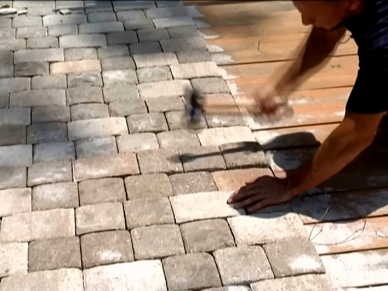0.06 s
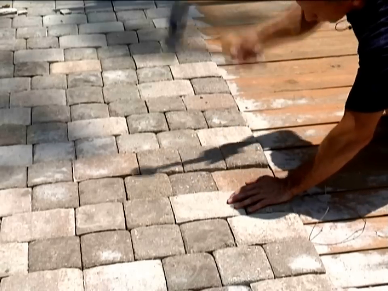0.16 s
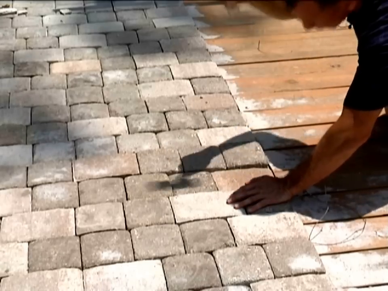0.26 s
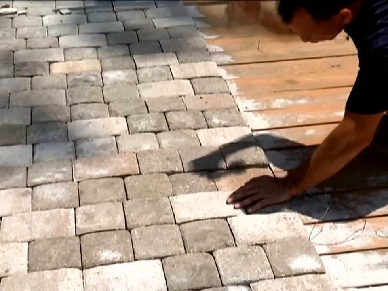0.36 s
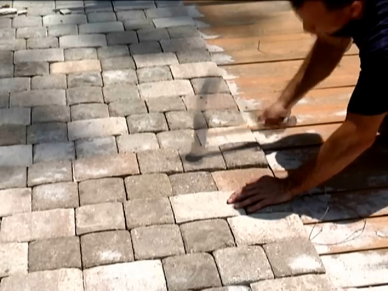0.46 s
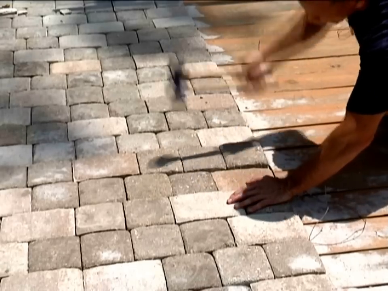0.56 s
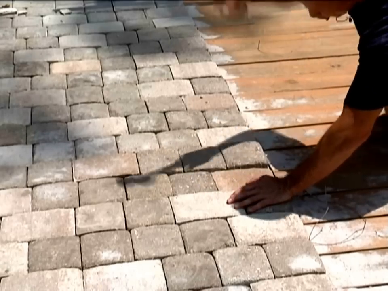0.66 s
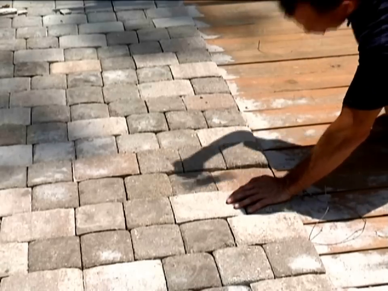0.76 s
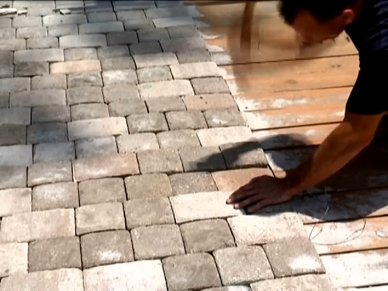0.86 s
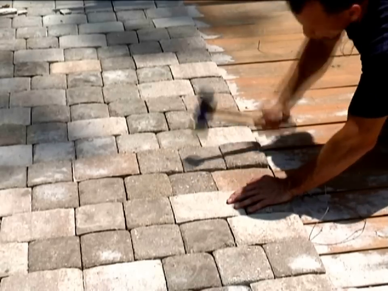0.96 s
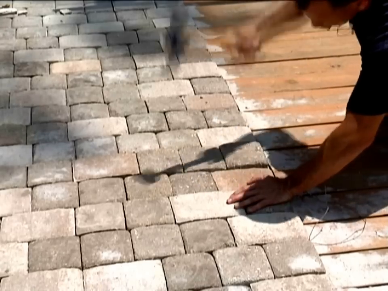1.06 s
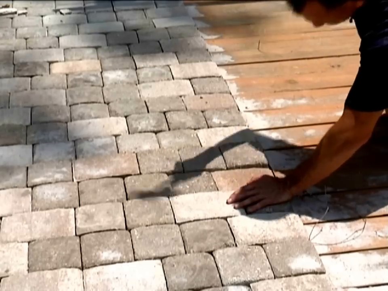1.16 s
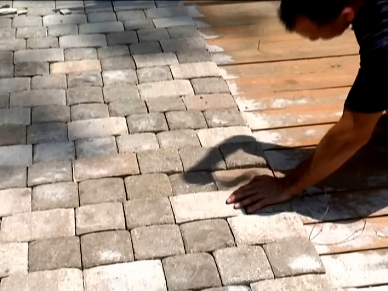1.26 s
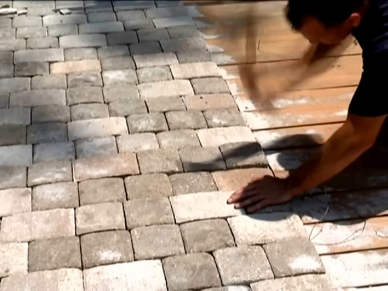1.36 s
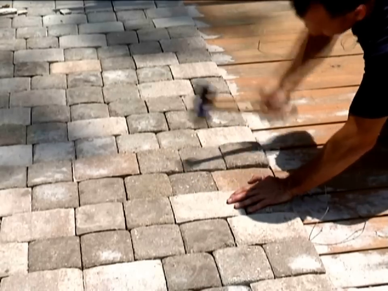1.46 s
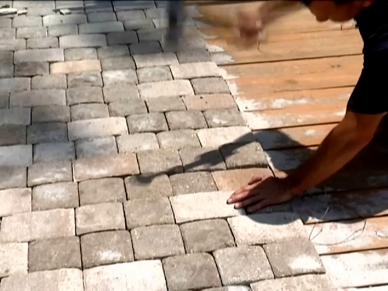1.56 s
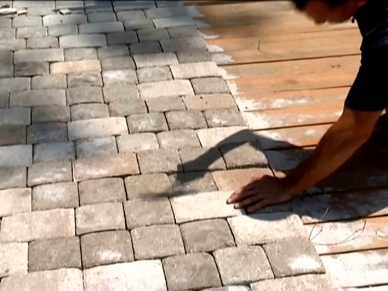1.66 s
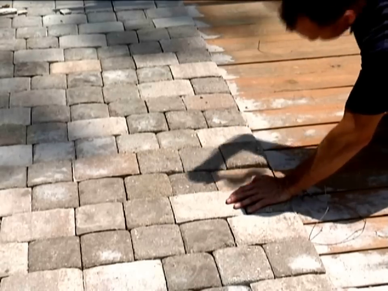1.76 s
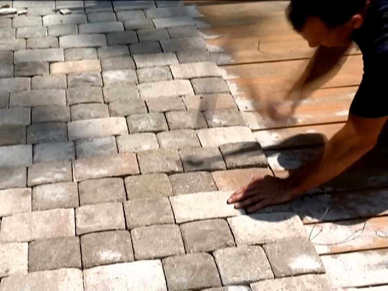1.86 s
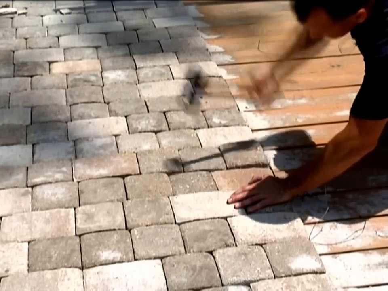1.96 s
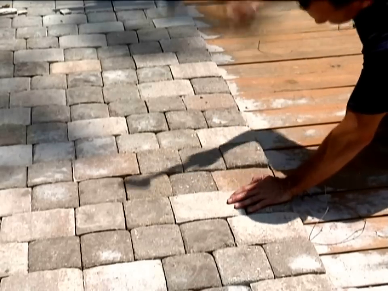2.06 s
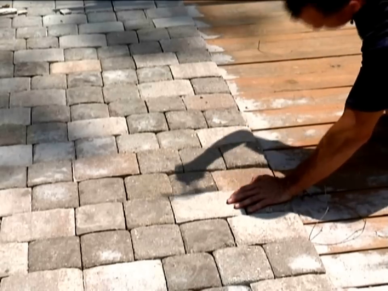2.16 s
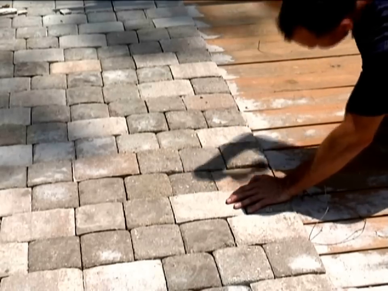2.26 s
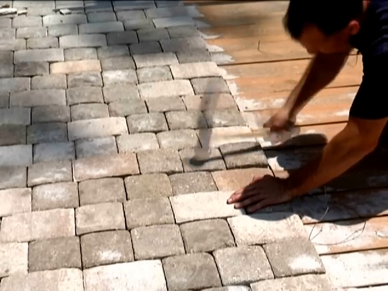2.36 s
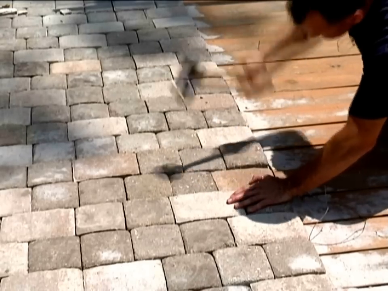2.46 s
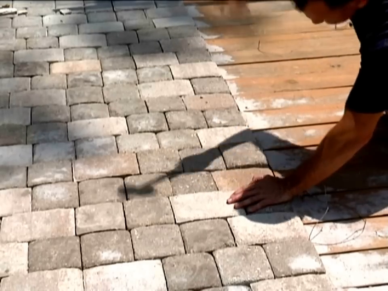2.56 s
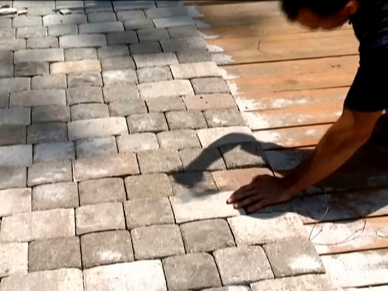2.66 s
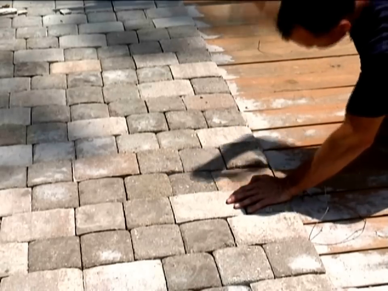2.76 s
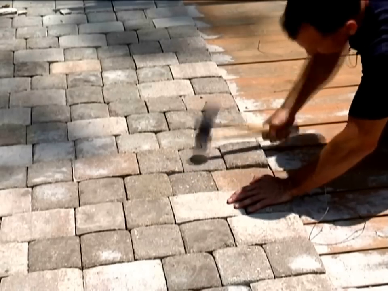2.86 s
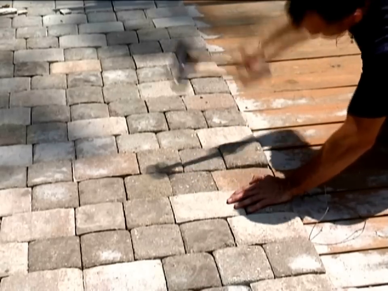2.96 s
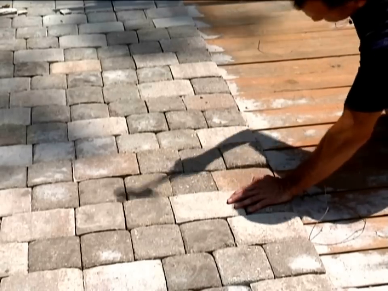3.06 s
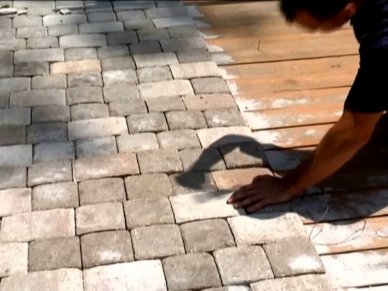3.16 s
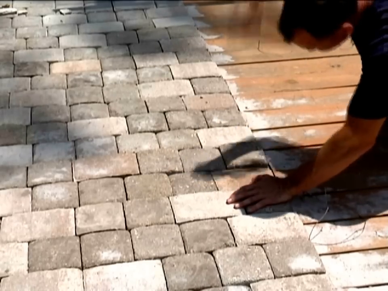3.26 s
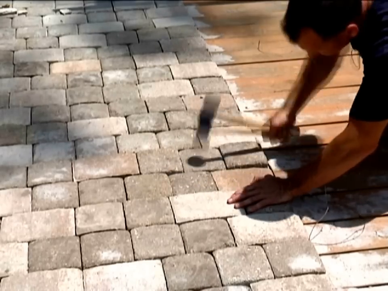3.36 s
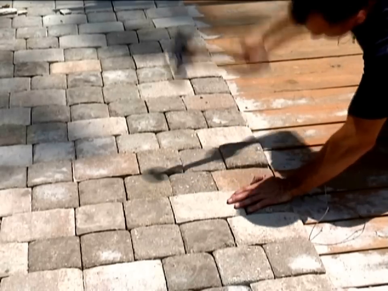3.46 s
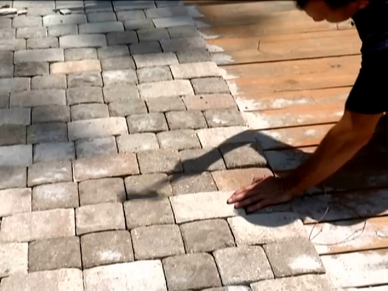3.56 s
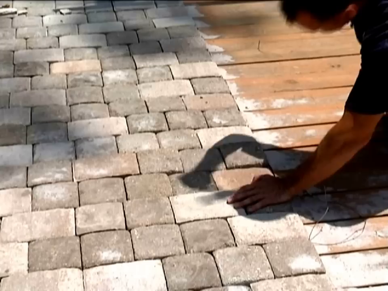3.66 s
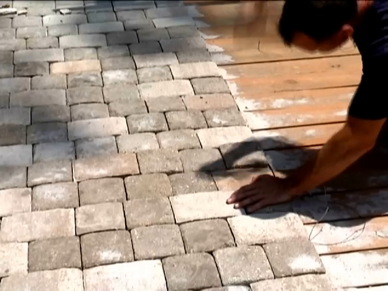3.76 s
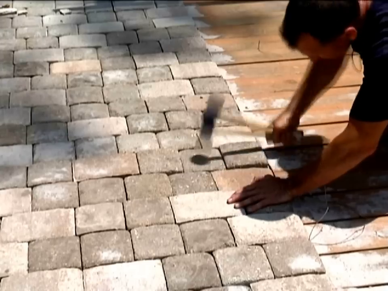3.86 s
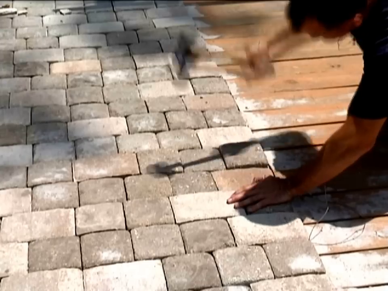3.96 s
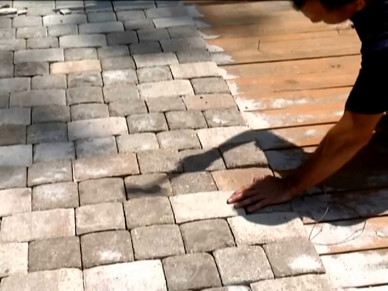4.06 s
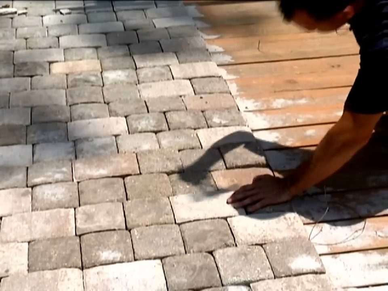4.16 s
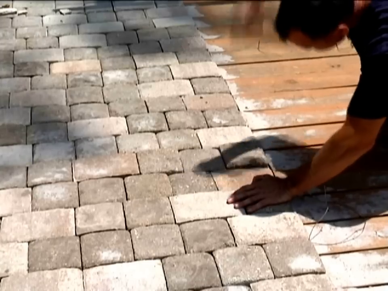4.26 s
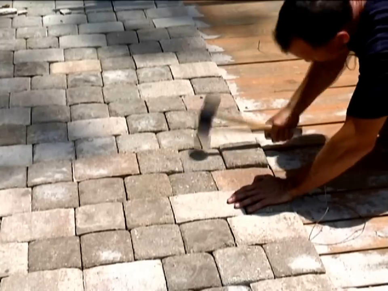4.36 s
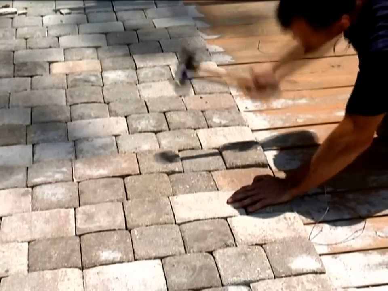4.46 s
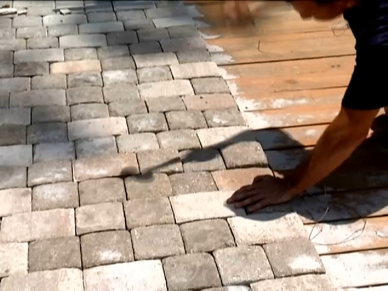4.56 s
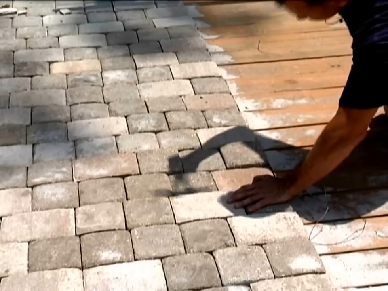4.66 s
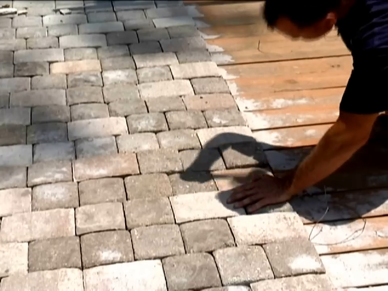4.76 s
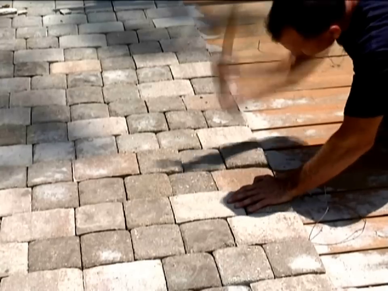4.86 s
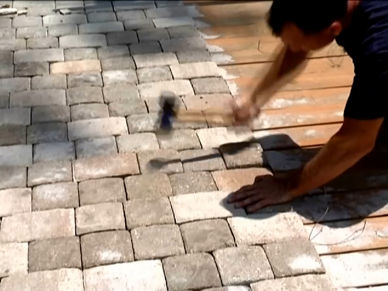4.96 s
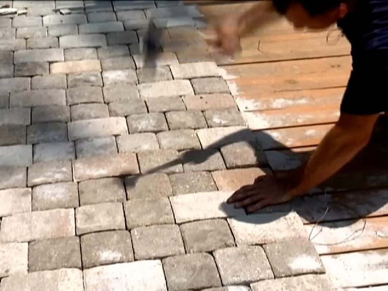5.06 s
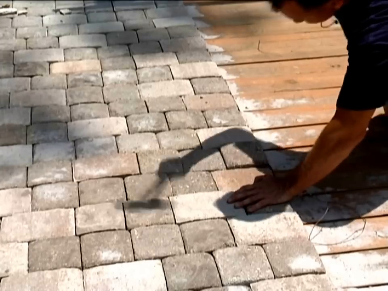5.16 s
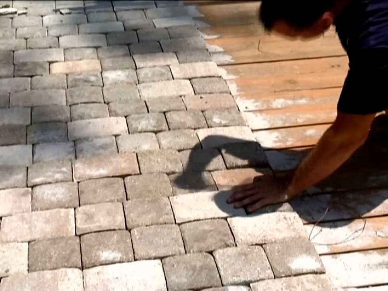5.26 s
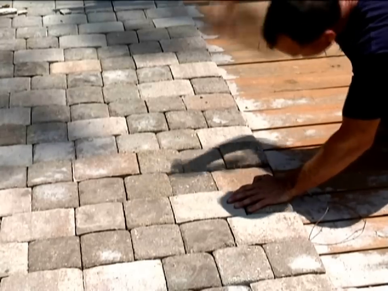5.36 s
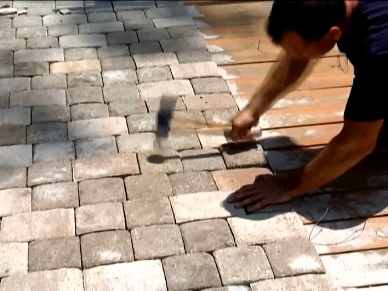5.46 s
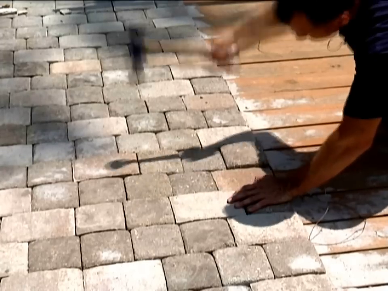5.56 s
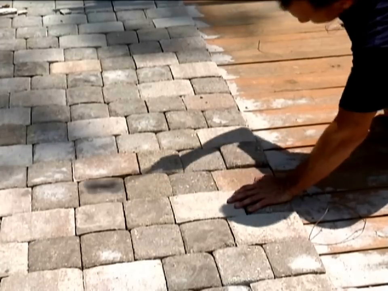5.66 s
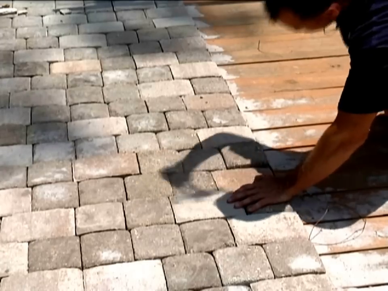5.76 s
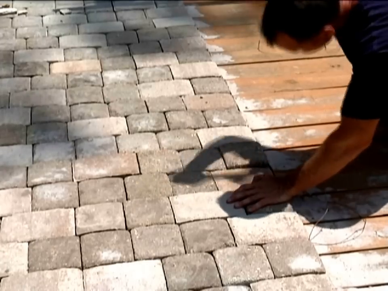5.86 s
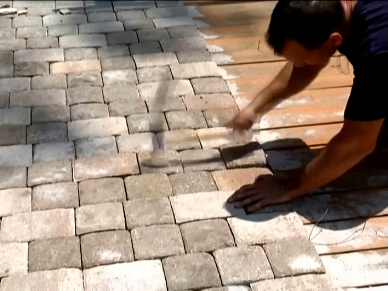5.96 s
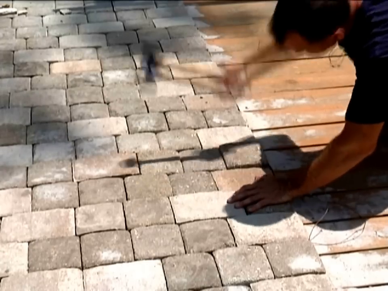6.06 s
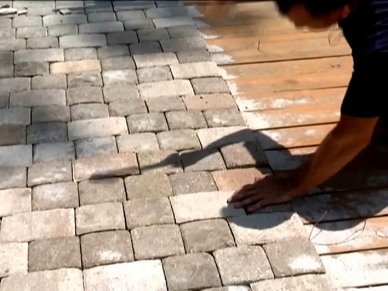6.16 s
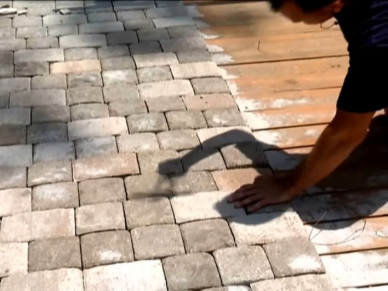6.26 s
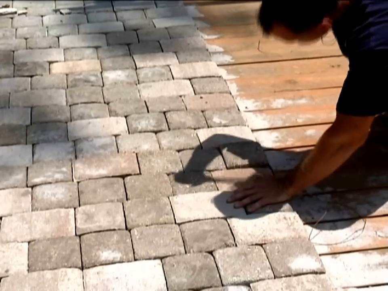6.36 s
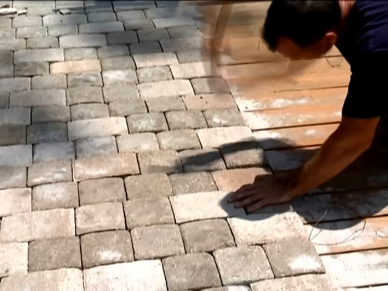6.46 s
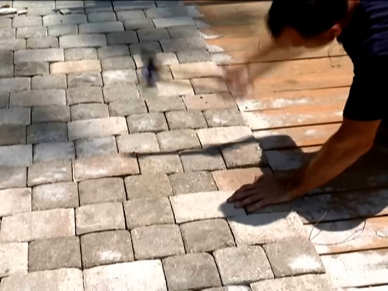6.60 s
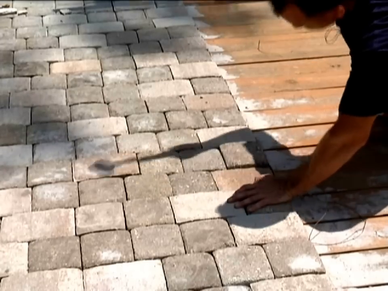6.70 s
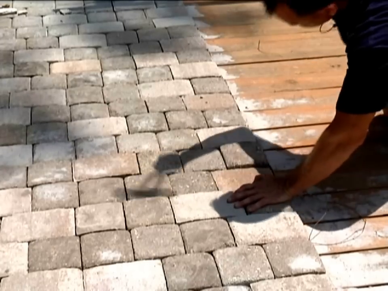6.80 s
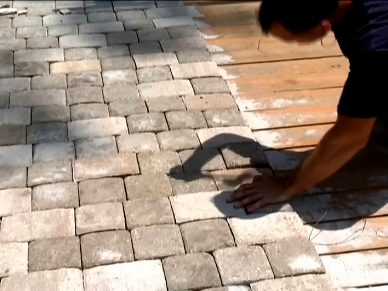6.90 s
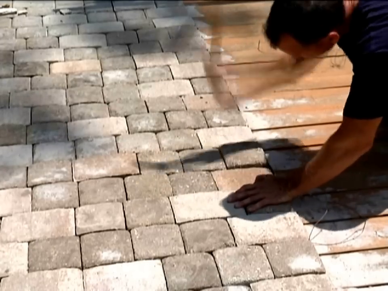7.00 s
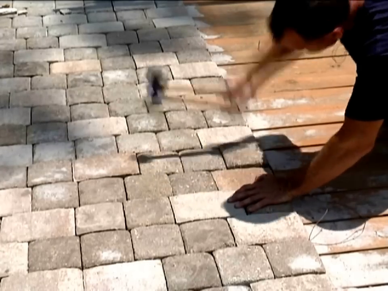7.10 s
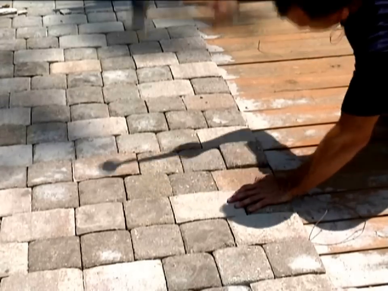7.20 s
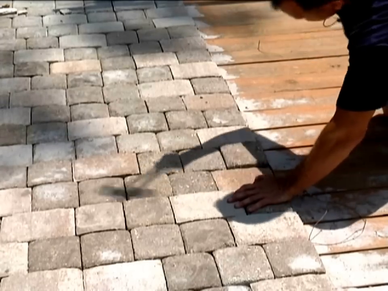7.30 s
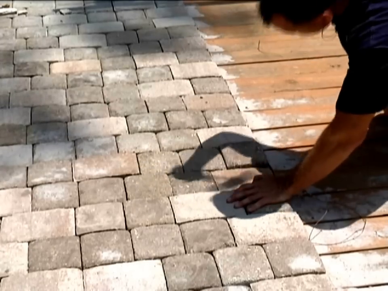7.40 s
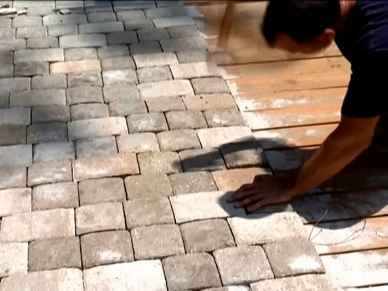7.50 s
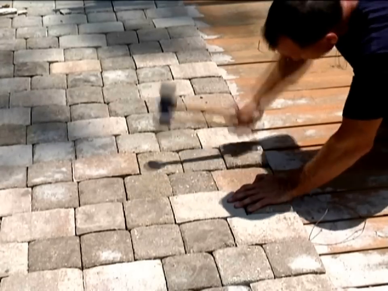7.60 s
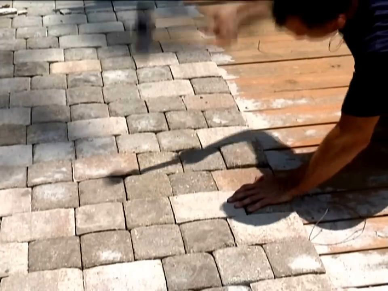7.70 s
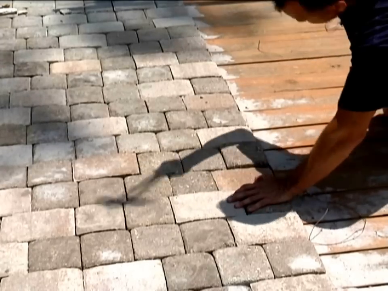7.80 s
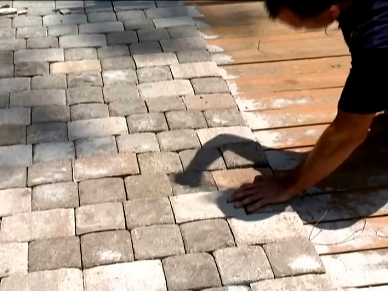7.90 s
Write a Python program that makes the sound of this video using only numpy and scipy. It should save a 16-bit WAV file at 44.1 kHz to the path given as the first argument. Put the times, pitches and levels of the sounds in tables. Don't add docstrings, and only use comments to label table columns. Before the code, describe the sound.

A rubber mallet strikes a concrete paver on a raised wooden deck outdoors, beginning immediately at 0 s and repeating about every half second, with the last of sixteen blows near 7.6 s. The opening two are slightly weaker; spacing widens a little after 4.3 s. Each blow is a hard rubbery slap with a deep 90 Hz deck thump, a knocky paver ring near 900 Hz, brief loose-stone rattle and a tiny rebound about 20 ms later, clearer on some later blows. On the left, a clothing microphone distorts on impact, then catches fizzy shirt rustle, coarser from 1.5 s, low body rumble and dry cable ticks, with short cloth drags around 2.8, 4.3 and 4.4 s. On the right, a farther microphone hears a cleaner, quieter thud and faint hum. Wall echoes follow within 0.2 s over a steady soft outdoor hush.

```python
import sys
import numpy as np
from scipy import signal
from scipy.fft import rfft, irfft
from scipy.io import wavfile
from scipy.ndimage import uniform_filter1d

SR = 44100
rng = np.random.default_rng(int(sys.argv[2]) if len(sys.argv) > 2 else 0)


def wrap_up_sound(samples):
    columns = np.atleast_2d(samples).T
    tamed = np.clip(columns, -1, 1)
    steps = np.round(tamed * 32767).astype(np.int16)
    wavfile.write(sys.argv[1], SR, steps)


def how_loud(loudness_db):
    steps = np.asarray(loudness_db, float) / 20
    return 10 ** steps


N = 350018
LEAD = 2048
FAR_S = 0.0052

# start_s, strength_db, paver_hz, rebound_db
FIRST_BLOW = (-.0045, -10, 900, -23)
BLOWS = [(0.467, -10, 891, -23), (0.921, -7.5, 904, -22.5), (1.399, -7.5, 893, -17),
         (1.879, -6.5, 925, -21), (2.364, -7.5, 932, -20), (2.852, -9, 943, -22), (3.34, -8, 873, -15),
         (3.842, -7.5, 926, -22), (4.343, -7.5, 868, -14), (4.905, -7, 915, -30), (5.442, -9, 899, -13),
         (5.972, -8.5, 890, -14), (6.512, -6.5, 832, -14), (7.035, -7.5, 864, -15),
         (7.561, -7.5, 898, -18.5)]
# mode_hz, level_db, t60_s, arrival_ms
NEAR_MODES = [(90.4, 25.5, 0.039, 4.783), (88.7, -15.5, 0.29, 6.7), (58, -25, 0.13, 12.6),
              (111, -16, 0.13, 5.1), (165.1, -4, 0.19, 5.23), (232.8, 5.5, 0.098, 4.34),
              (340.5, -20, 0.33, 2.53), (438, 7.5, 0.063, 3.66), (494, -12.5, 0.13, 1.37),
              (736, 3, 0.079, 1.224), (1345, 2.5, 0.016, 0.64)]
# mode_hz, level_db, t60_s, arrival_ms
FAR_MODES = [(81.4, -15.5, 0.25, 4.4), (140, -18, 0.12, 4.2), (189, -12, 0.098, 0.86),
             (258, -9.5, 0.11, 3.18), (377, -9, 0.08, 2.06), (470, 5.5, 0.0088, 1.264),
             (824, -21, 0.0043, 0.92), (2650, -5, 0.0045, 0.023), (2990, -10.5, 0.0058, 0.12),
             (6720, 0, 0.0046, 0.037), (6600, -29, 0.089, 0.39)]
# freq_hz, level_db
SLAP_COLOUR = [(300, -8), (1000, 4.5), (2200, 3.5), (3800, -8.5), (6300, -1.5), (10000, -2.5),
               (14000, -5.5), (16000, -43)]
# freq_hz, level_db
SHAKE_COLOUR = [(100, 7.5), (200, 6.5), (450, 3), (900, -12), (1500, -32), (3000, -27), (6000, -63)]
# freq_hz, t60_s
YARD_T60 = [(80, 0.83), (250, 0.8), (700, 0.44), (2000, 0.87), (6000, 1), (12000, 0.47)]
# freq_hz, shirt_db, camera_db
YARD_COLOUR = [(50, -14, -38), (97, -30, -9), (272, -11.5, -21), (642, -28.5, -26), (1360, -29.5, -40),
               (2580, -30, -35), (4250, -37.5, -45.5), (6700, -34, -40.5), (10400, -29.5, -33),
               (14700, -44, -65), (15100, -90, -100)]
# delay_ms, over_tail_db
ECHOES = [
    (62, -1.5),
    (67, -25),
    (97, -0.5),
    (196, 0.5),
]
# freq_hz, level_db
RUSTLE_COLOUR = [(500, 9), (1200, -9.5), (2500, -15.5), (3900, -5), (5500, 0), (9000, -1.2), (12000, -2),
                 (14000, -6.5), (14800, -40), (15500, -80)]
# freq_hz, level_db
RUMBLE_COLOUR = [(20, -20), (40, -6), (70, 5.5), (130, 0.5), (220, -7), (400, -15), (800, -37), (1500, -52),
                 (5000, -73)]
# freq_hz, level_db
RASP_COLOUR = [(300, -31), (900, 2.5), (1800, -5), (2700, 0.5), (3300, -7.5), (3900, -59), (6000, -48)]
# rustle_db, rasp_db
JOLTS = [(-49.5, -77), (-54, -77), (-45, -60), (-46, -52.5), (-45, -61), (-45, -51.5), (-48, -46.5),
         (-47, -48), (-49, -47), (-43.5, -46), (-44.5, -49), (-53, -72), (-49, -51.5), (-47.5, -48),
         (-49.5, -51), (-51.5, -54)]
# peak_s, peak_db, fade_db_per_s
LIFTS = [(0.17, -77, 85.5), (0.42, -71, 190), (2.68, -67, 147), (3.25, -64.5, 115), (3.72, -62, 93),
         (4.73, -62.5, 39), (5.28, -53.5, 95), (5.72, -63, 105), (6.27, -63.5, 55), (6.81, -62, 100),
         (7.33, -66, 91), (7.93, -59, 394.5)]
# start_s, length_s, end_db, swell_db, pitch_factor
DRAGS = [
    (2.806, 0.052, -36.5, 12, 2.5),
    (4.312, .03, -42.5, -2.5, 2.2),
    (4.412, 0.045, -34, -3.5, 0.95),
]
# mode_hz, width_hz, level_db
DRAG_MODES = [(196, 140, 23), (416, 75, 13.5), (536, 40, -8), (705, 14, -9)]
# mode_hz, t60_s
CLIP_MODES = [(900, 0.0097), (2500, 0.0098), (5400, 0.011), (10300, 0.012)]
# start_s, peak_db, top_mode_db
KNOCKS = [
    (2.341, -27.5, -16),
    (2.816, -34.5, -11),
    (3.809, -27, -35),
    (4.314, -52, 9),
    (5.394, -36.5, -17),
    (6.468, -56, 11),
    (6.95, -42, -14),
    (7.523, -28, -23),
]
# start_s, peak_db, top_mode_db
SNAPS = [(0.458, -46, -2), (0.756, -48, -14), (0.905, -31.5, 7.5), (1.348, -56, -10), (1.38, -37.5, -3),
         (1.86, -38.5, 3), (2.311, -29.5, -0.5), (3.325, -34, -2), (3.445, -44, 7), (3.826, -47, 11),
         (4.891, -38, 1), (5.415, -35.5, 3.5), (5.72, -48, -25), (5.746, -43, -2), (6.27, -37, -1),
         (6.299, -44, 0.5), (6.822, -29, 0.3), (6.847, -38, -3), (7.337, -31.5, -5), (7.833, -43, -6),
         (7.881, -45, -13)]
# start_s, peak_db, top_mode_db
PINGS = [(0.074, -52, 12), (0.128, -34.5, -7), (0.986, -50, 16), (0.293, -55, 0), (0.311, -61, 12),
         (1.302, -52, -2), (1.449, -34, -7), (2.144, -29.5, -5), (2.61, -40, -8), (2.836, -39, 7),
         (4.984, -33, -3), (5.165, -45, -14), (7.351, -40, 1)]
# freq_hz, shirt_db, camera_db
AIR_COLOUR = [(30, -21, -26), (60, -26, -7), (150, -7.5, -11.5), (400, -11, -19), (1020, -9.5, -24.5),
              (2380, -22.5, -35), (4060, -48, -41), (6700, -47, -39), (9800, -25, -38), (12600, -48, -74),
              (13900, -70, -90), (14900, -100, -110)]
# freq_hz, gain_db
CAMERA_RESPONSE = [(30, -16), (60, -15), (100, 2.5), (2500, 2), (4600, 0), (6400, 2.5), (8500, -8),
                   (11000, -8.5), (14000, -39)]
# from_hz, open_db
TOP_BANDS = [(12000, -93), (12800, -88), (13700, -80), (14400, -72), (15200, -68), (16000, -72)]


def mallet():
    out, kicks = np.zeros((2, N + LEAD)), np.zeros(N + LEAD)
    for start_s, strength_db, paver_hz, rebound_db in [FIRST_BLOW] + list(BLOWS):
        hit_s, force = start_s + 0.0007, how_loud(strength_db + 9)
        deck_modes(out, hit_s, force)
        lead_in(out, hit_s, force)
        paver_slap(out, hit_s, force, paver_hz)
        grit(out, hit_s, force)
        rebound(out, hit_s, force * how_loud(rebound_db - 7.5), paver_hz)
        add(kicks, hit_s, force * (np.eye(1, 2048)[0] + 0.19 * burst(0.00053)))
    out += how_loud(11.5) * signal.oaconvolve(kicks[None], yard(), axes=1)[:, :N + LEAD]
    return out[:, LEAD:]


def deck_modes(out, hit_s, force):
    spot = rng.standard_normal((2, 11, 2))
    for side, (modes, gain_db) in enumerate([(NEAR_MODES, -12), (FAR_MODES, -13)]):
        body = 0
        for (hz, level_db, t60_s, arrival_ms), (u, v) in zip(modes, spot[side]):
            body = body + how_loud(level_db + 1.22 * u) * ring(hz * (1 + 0.024 * v), t60_s, arrival_ms)
        add(out[side], hit_s + side * FAR_S, force * how_loud(gain_db) * body)


def lead_in(out, hit_s, force):
    swell = np.linspace(0, 1, 500) ** 6
    count = len(swell)
    from_s = hit_s - count / SR
    add(out[0], from_s, force * how_loud(-9.0) * swell * (1 + 0.54 * burst(0.068)[:count]))
    add(out[0], from_s, force * how_loud(-14.5) * np.sqrt(swell) * burst(0.6, colour=SHAKE_COLOUR)[:count])
    add(out[1], from_s + FAR_S, force * how_loud(-15) * swell * burst(0.2)[:count])


def paver_slap(out, hit_s, force, paver_hz):
    add(out[0], hit_s, force * how_loud(6.5) * -ring(paver_hz, 0.025, 0, count=4096))
    low_hz = paver_hz * rng.uniform(0.5614, 0.7585)
    add(out[0], hit_s, force * how_loud(3.5) * ring(low_hz, 0.042, rng.uniform(0.48, 1.35), count=4096))
    add(out[0], hit_s, force * how_loud(7.5) * burst(0.0072, 0.55))
    add(out[1], hit_s + FAR_S, force * how_loud(-8.5) * (burst(0.0037) + how_loud(-26.5) * burst(0.15)))


def grit(out, hit_s, force):
    add(out[0], hit_s, force * how_loud(-14.5) * burst(0.061, 3))
    add(out[0], hit_s, force * how_loud(-7) * burst(0.11, 2.3, SHAKE_COLOUR, count=8192))
    late_fade = np.clip((np.arange(16384) / SR - 0.03) / 0.024, 0, 1)
    add(out[0], hit_s, force * how_loud(-23.5) * burst(0.49, 29, SHAKE_COLOUR, count=16384) * late_fade)
    add(out[1], hit_s + FAR_S, force * how_loud(-44) * burst(0.71, 2.44, SHAKE_COLOUR, count=8192))


def rebound(out, hit_s, gain, paver_hz):
    rebound_ms, handle_hz = 22.2, 5670
    slap = burst(0.035, rebound_ms - 0.4)
    paver = 1.66 * ring(paver_hz, 0.034, rebound_ms, count=2048)
    handle = 1.85 * ring(handle_hz, 0.0086, rebound_ms + 0.3, count=2048)
    add(out[0], hit_s, gain * (slap + paver + handle))


def yard():
    taps = np.zeros((2, SR))
    at = np.arange(400, SR - 22, 22) + rng.integers(0, 22, (2, (SR - 401) // 22))
    np.put_along_axis(taps, at, rng.choice([-1., 1.], at.shape), axis=1)
    for delay_ms, over_tail_db in ECHOES:
        taps[:, round(delay_ms * SR / 1000)] += how_loud(over_tail_db + np.array([6, 15]))
    hz, t, z = signal.stft(taps, SR, nperseg=512)
    colour_db = np.array([read(YARD_COLOUR, hz, column=k) for k in (1, 2)])[..., None]
    thin_db = -6.0 * np.outer(hz > 1000, t < ECHOES[0][0] / 1000 - 0.004)
    decay_db = -60 * t / read(YARD_T60, hz)[:, None]
    tail = signal.istft(z * how_loud(colour_db + thin_db + decay_db), SR, nperseg=512)[1]
    onset = np.clip(np.arange(tail.shape[1]) / SR / 0.029 - 1, 0, 1)
    return tail * onset


def shirt():
    grain_gain = how_loud(1.0 * np.minimum(rng.exponential(1, N), 5))
    grains = grain_gain * rng.standard_normal(N) * (rng.random(N) < 3000 / SR)
    smooth = noise(lambda hz: read(RUSTLE_COLOUR, hz), size=256, patchy_db=4.5, flicker_db=1.0)
    rustle = evened(evened(smooth) + 0.74 * evened(coloured(grains, RUSTLE_COLOUR)))
    rumble = evened(noise(lambda hz: read(RUMBLE_COLOUR, hz), size=1024, patchy_db=2.5, flicker_db=-1.0))
    rasp = evened(noise(lambda hz: read(RASP_COLOUR, hz), size=512, patchy_db=5.5, flicker_db=-1.0))
    rustle_power, rumble_power, rasp_power = shirt_motion()
    out = 0
    for layer, gain_db, power, rest_db in [(rustle, 13.2, rustle_power, -66),
                                           (rumble, 7.8, rumble_power, -50.5),
                                           (rasp, 6.5, rasp_power, -71.5)]:
        out = out + how_loud(gain_db) * np.sqrt(power + how_loud(rest_db) ** 2) * layer
    return out


def shirt_motion():
    blow_s = np.array([FIRST_BLOW] + list(BLOWS))[:, 0]
    rustle_db, rasp_db = np.transpose(JOLTS)
    lift_s, lift_db, fade_db_per_s = np.transpose(LIFTS)
    fine = peaks(blow_s + 0.1, rustle_db, rise_db_per_s=133, fall_db_per_s=116)
    coarse = peaks(blow_s + 0.1, rasp_db, rise_db_per_s=133, fall_db_per_s=77)
    lift = peaks(lift_s, lift_db, fade_db_per_s, fade_db_per_s)
    downswing = peaks(blow_s, -58, rise_db_per_s=214, fall_db_per_s=1000)
    arm = lift + downswing
    body = peaks(blow_s + 0.091, -40, rise_db_per_s=77, fall_db_per_s=60)
    return fine + arm, body, coarse + how_loud(-2.5) ** 2 * arm


def drag():
    attack_s, release_lengths, fade_db = 0.008, 2.22, -23
    slips = rng.standard_normal(N) * (rng.random(N) < 600 / SR)
    out = np.zeros(N)
    for start_s, length_s, end_db, swell_db, pitch in DRAGS:
        body = sum(how_loud(db) * ring(pitch * hz, 1.9 / (pitch * width_hz), 0, count=4096)
                   for hz, width_hz, db in DRAG_MODES)
        stroke = [(start_s, end_db - swell_db - 21),
                  (start_s + attack_s, end_db - swell_db),
                  (start_s + length_s, end_db),
                  (start_s + length_s * (1 + release_lengths), end_db + fade_db)]
        out += how_loud(15) * curve(stroke) * evened(signal.oaconvolve(slips, body)[:N])
    return out


def cable():
    out = np.zeros(N + LEAD)
    for rows, low_modes_db in [(KNOCKS, (0, -15.5, -39)), (SNAPS, (-4.5, 0, -7)), (PINGS, (-19, -34, 0))]:
        for start_s, peak_db, edge_db in rows:
            modes_db = [*low_modes_db, edge_db]
            detune = 1 + 0.03 * rng.standard_normal(4)
            tick = sum(how_loud(db) * ring(hz * d, t60_s, 0, count=2048)
                       for (hz, t60_s), db, d in zip(CLIP_MODES, modes_db, detune))
            mode_points = [(hz, db) for (hz, _), db in zip(CLIP_MODES, modes_db)]
            colour = [(300, -46)] + mode_points + [(15000, edge_db - 19)]
            snap = how_loud(max(modes_db) - 2) * burst(0.0065, colour=colour)
            add(out, start_s + 0.00039, how_loud(peak_db + 9) * (1.2 * tick + snap))
    return out[LEAD:]


def air():
    floor_db, hum_hz, hum_width_hz, hum_db = -63, 361, 22, -60.5
    near, far = (noise(lambda hz: read(AIR_COLOUR, hz, column=k), size=1024, patchy_db=0.0, flicker_db=-3.0)
                 for k in (1, 2))
    hum = signal.oaconvolve(rng.standard_normal(N), ring(hum_hz, 2.6 / hum_width_hz, 0))[:N]
    hush = how_loud(floor_db + 11) * np.array([near, far]) / near.std()
    return hush + how_loud(hum_db) * evened(hum) * [[0], [1]]


def read(points, x, column=1):
    rows = np.array(points)
    return np.interp(np.log(x + 1), np.log(rows[:, 0] + 1), rows[:, column])


def evened(x):
    return x / np.sqrt(np.mean(x ** 2) + 1e-20)


def add(mix, start_s, sound):
    part = mix[LEAD + round(start_s * SR):][:len(sound)]
    part += sound[:len(part)]


def ring(hz, t60_s, delay_ms, count=12000):
    t = np.maximum(np.arange(count) / SR - delay_ms / 1000, 0)
    return how_loud(-60 * t / t60_s) * np.sin(2 * np.pi * hz * t)


def coloured(x, points):
    gain = how_loud(read(points, np.fft.rfftfreq(len(x), 1 / SR)))
    return irfft(rfft(x) * gain, len(x))


def burst(t60_s, delay_ms=0, colour=SLAP_COLOUR, count=2048):
    t = np.arange(count) / SR - delay_ms / 1000
    crack = evened(coloured(rng.standard_normal(count), colour))
    return crack * how_loud(-60 * np.maximum(t, 0) / t60_s) * (t >= 0)


def noise(db_of_hz, size, patchy_db, flicker_db):
    frames, hz = 4 * N // size + 5, np.fft.rfftfreq(size, 1 / SR)
    a, b, patch = rng.standard_normal((frames, len(hz), 3)).T
    patch = evened(uniform_filter1d(uniform_filter1d(patch, size=6, axis=0), size=10, axis=1))
    flicker = evened(uniform_filter1d(rng.standard_normal(frames), size=3))
    level_db = db_of_hz(hz)[:, None] + patchy_db * patch + flicker_db * flicker
    z = (a + 1j * b) * how_loud(level_db)
    return signal.istft(z, nperseg=size, noverlap=size * 3 // 4)[1][:N]


def curve(rows):
    time_s, level_db = np.transpose(rows)
    return how_loud(np.interp(np.arange(N) / SR, time_s, level_db, -120, -120))


def peaks(peak_s, peak_db, rise_db_per_s, fall_db_per_s):
    at = np.arange(0, N + 64, 64)
    peak_s, peak_db, rise, fall = (np.reshape(v, (-1, 1))
                                   for v in (peak_s, peak_db, rise_db_per_s, fall_db_per_s))
    late_s = at / SR - peak_s
    slope = np.where(late_s < 0, rise, -fall)
    power = (how_loud(peak_db + slope * late_s) ** 2).sum(axis=0)
    return np.interp(np.arange(N), at, power)


def scene():
    worn = shirt() + drag() + cable()
    return mallet() + air() + worn * how_loud(np.array([[0], [-45]]))


def notches(x):
    hz = np.r_[150, np.arange(300, 5400, 600), np.arange(600, 13800, 600)]
    width_hz = np.where(hz % 600 == 0, 45, 30)
    depth_db = np.where(hz % 600 == 0, -14, -9)
    pole = np.exp(-np.pi * width_hz / SR)
    zero = np.exp(-np.pi * width_hz * how_loud(depth_db) / SR)
    turn, one = -2 * np.cos(2 * np.pi * hz / SR), np.ones(len(hz))
    sections = np.column_stack([one, turn * zero, zero ** 2, one, turn * pole, pole ** 2])
    return signal.sosfilt(sections, x)


def top_gate(x):
    hz, t, z = signal.stft(x, SR, nperseg=1024)
    keep = np.ones(z.shape)
    next_bands = list(TOP_BANDS[1:]) + [(SR / 2, 0)]
    for (low_hz, open_db), (high_hz, _) in zip(TOP_BANDS, next_bands):
        band = (hz >= low_hz) & (hz < min(high_hz, low_hz + 900))
        power = (abs(z[:, band]) ** 2).mean(axis=1, keepdims=True)
        keep[:, hz >= low_hz] *= power > how_loud(open_db) ** 2
    return signal.istft(z * keep, SR, nperseg=1024)[1][:, :N]


def band_limit(x):
    return signal.sosfilt(signal.butter(12, 16530, fs=SR, output="sos"), x)


def record(dry):
    ceiling = how_loud(-7.5)
    near = dry[0] / (1 + abs(dry[0] / ceiling) ** 5.48) ** (1 / 5.62)
    near = signal.lfilter(*signal.butter(1, 25, "high", fs=SR), near)
    far = 0.75 * np.tanh(coloured(dry[1], CAMERA_RESPONSE) / 0.75)
    wide = top_gate(notches(np.array([near, far])))
    edge = signal.firwin(101, 15600, window=("kaiser", 7), fs=SR)
    mix = signal.oaconvolve(wide, edge[None], "same", axes=1)
    return band_limit(mix)


dry = scene()
out = record(dry)
wrap_up_sound(out)
```